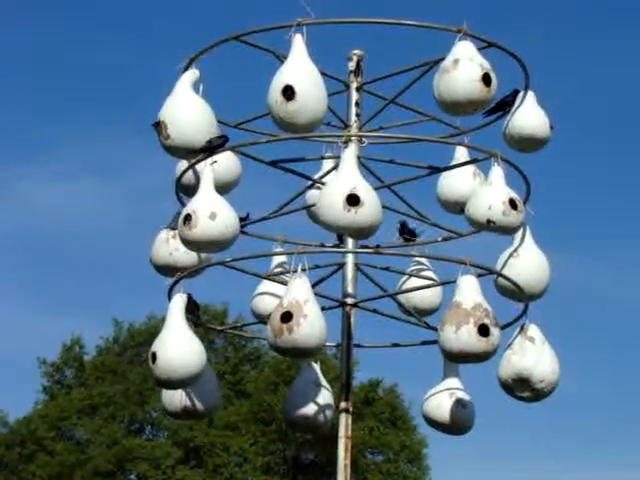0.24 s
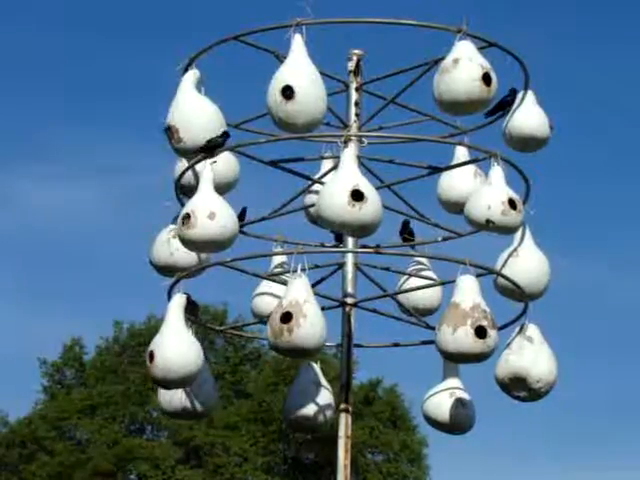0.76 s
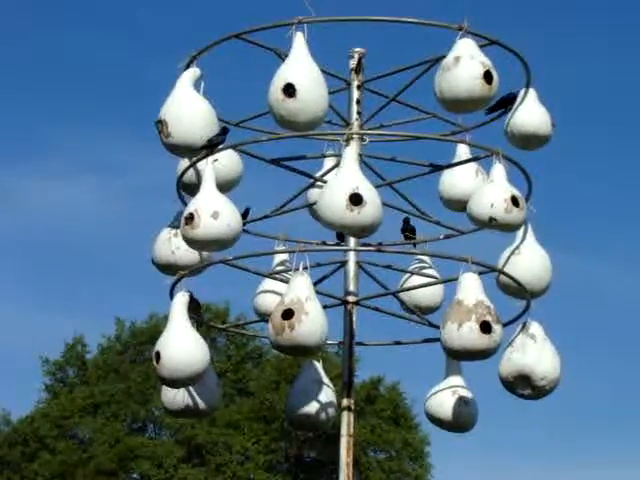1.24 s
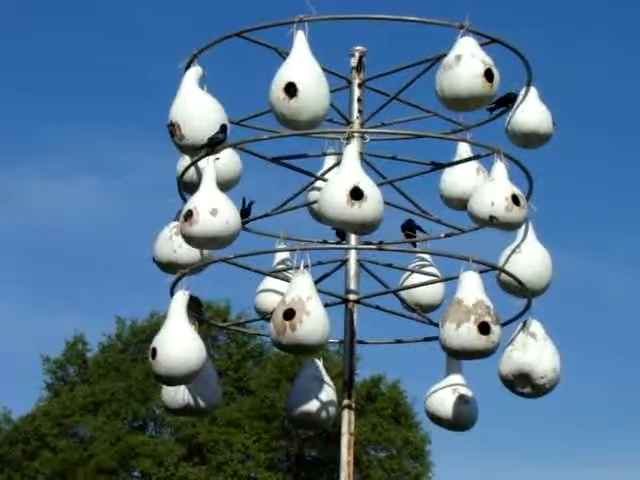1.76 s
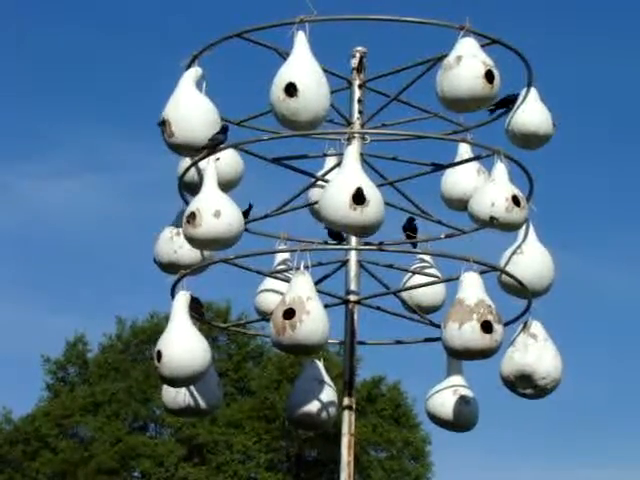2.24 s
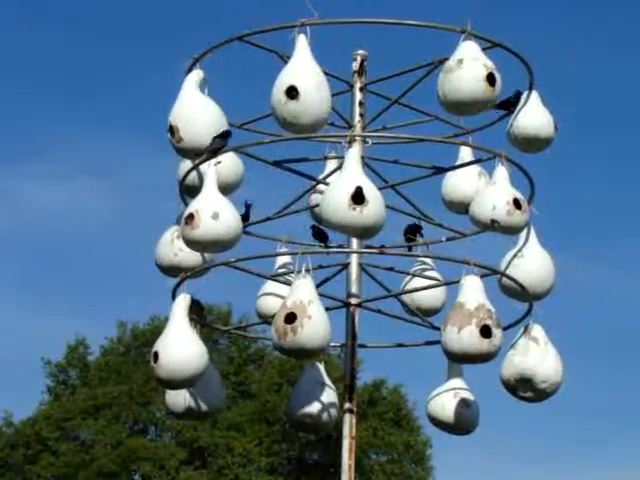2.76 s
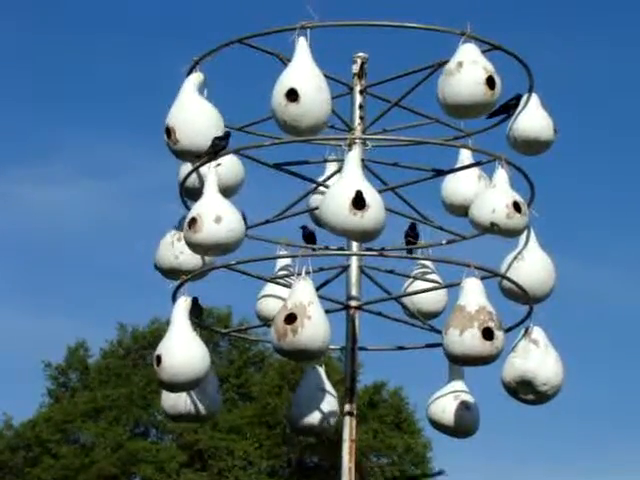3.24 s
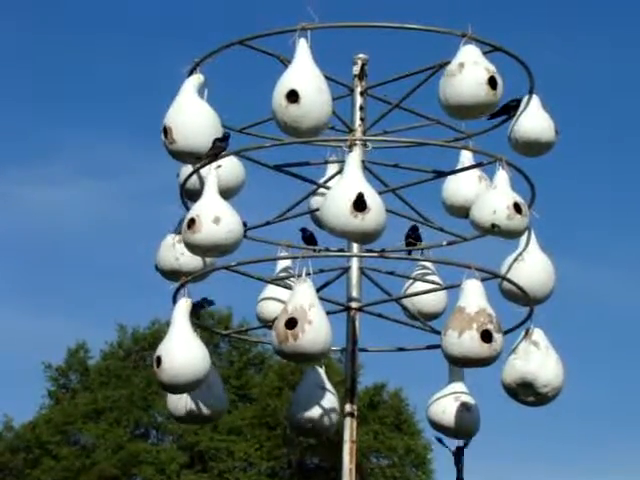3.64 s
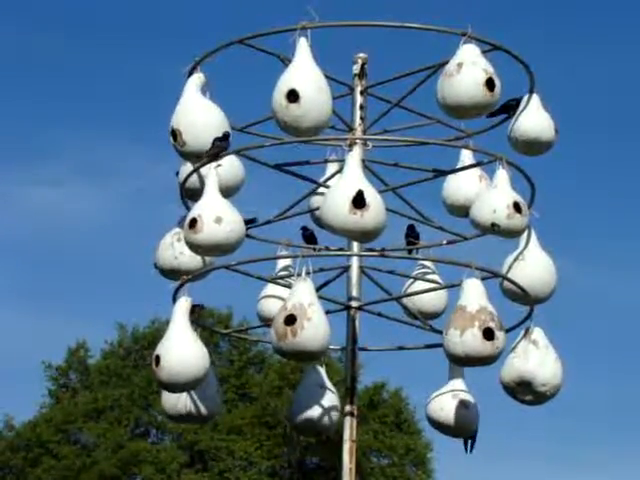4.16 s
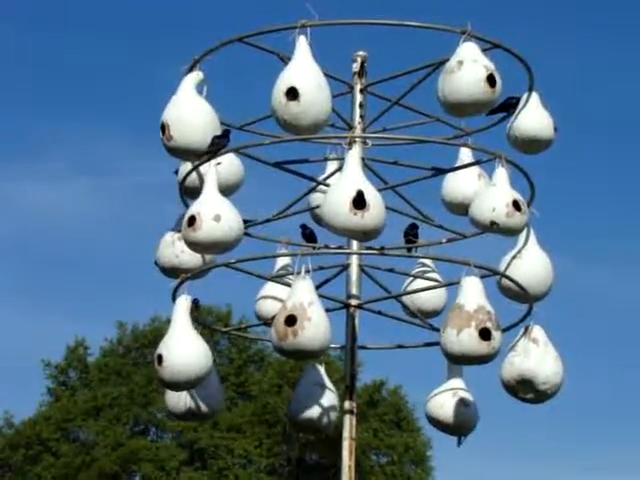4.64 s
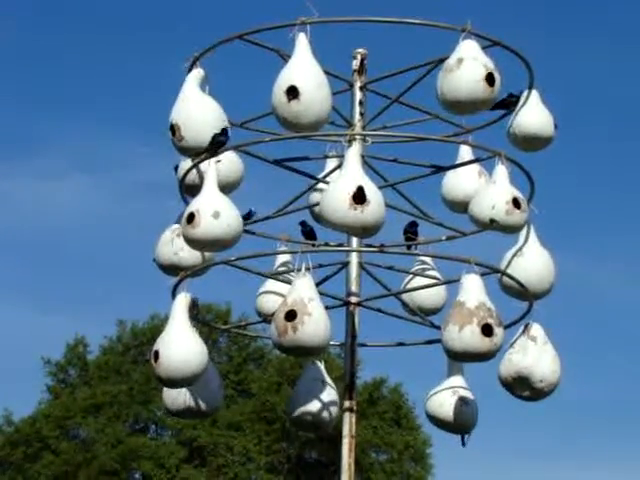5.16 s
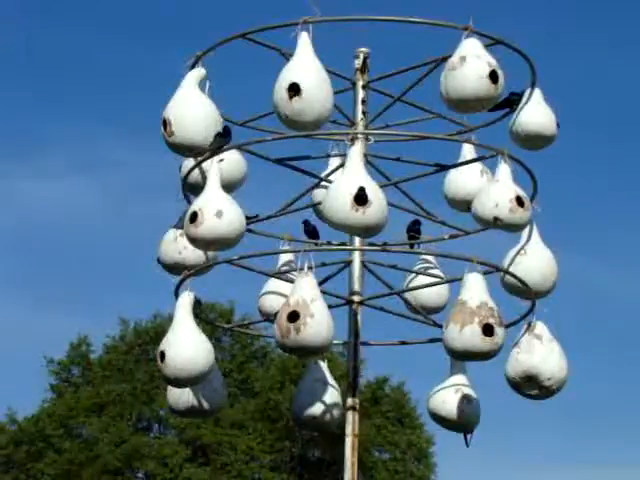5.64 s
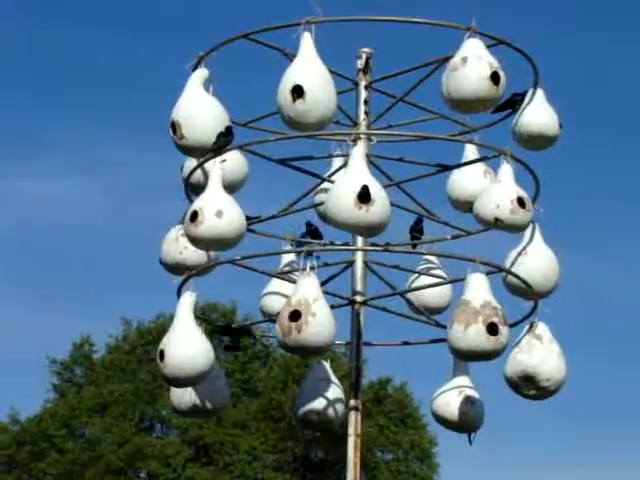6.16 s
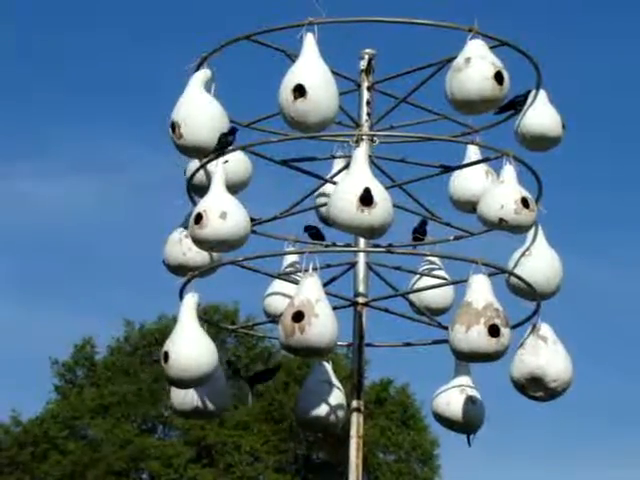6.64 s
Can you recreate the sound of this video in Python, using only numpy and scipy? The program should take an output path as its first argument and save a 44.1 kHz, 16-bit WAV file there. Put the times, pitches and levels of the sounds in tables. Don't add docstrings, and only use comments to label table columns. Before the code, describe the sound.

An outdoor colony of martins heard from some metres away on a small camera microphone. From 0 to 0.9 s chirps crowd together: fast falling chips, a full cheer near 0.2 s, gurgles and bright calls around 0.7 s. From 0.95 to 1.4 s only thin, soft whistles remain. A sharp cluster breaks in at 1.5 s, with more chips and a clear whistle near 2 s and a loud group around 2.4 s. A few dry bill clicks come at 2.7-3 s. From 3.3 to 4.3 s rattles mix with arched, dropping calls; a quieter gap follows, then strong calls near 4.9-5.2 s and a clear high whistle at 5.6 s. From 5.8 s to the end at about 6.9 s, overlapping chatter, rattles, low gulps and hoarse notes thicken. Soft leaves, far birds, distant traffic and hiss continue beneath, with low wind puffs, stronger near 0.4 and 3 s.

```python
import sys
import numpy as np
from scipy import signal
from scipy.fft import rfft, irfft
from scipy.io import wavfile
from scipy.ndimage import uniform_filter1d

SR = 44100
rng = np.random.default_rng(int(sys.argv[2]) if len(sys.argv) > 2 else 0)


def ratio(d):
    e = np.asarray(d, float) / 20
    return 10 ** e


def int16_out(signal):
    q = np.round(np.clip(np.atleast_2d(signal).T, -1, 1) * 32767)
    wavfile.write(sys.argv[1], SR, q.astype(np.int16))


N = 304290

SLACK_HZ, STROKE_SLACK_HZ = 1200, 1340
SAG_OCT_S = -2.2


def coloured(points):
    hz, db = np.transpose(points)
    f = np.maximum(np.arange(N // 2 + 1) * SR / N, 1)
    gain = ratio(np.interp(np.log(f), np.log(hz), db))
    x = irfft(rfft(rng.standard_normal(N)) * gain, N)
    return x / np.std(x)


def walk(rate):
    k = int(SR / rate)
    steps = np.repeat(rng.standard_normal(N // k + 1), k)
    x = uniform_filter1d(uniform_filter1d(steps, k), k)[:N]
    return x / np.std(x)


def swell(u, rise, fall):
    opening = np.sin(np.pi / 2 * np.clip(u / rise, 0, 1)) ** 2
    closing = np.sin(np.pi / 2 * np.clip((1 - u) / fall, 0, 1)) ** 2
    return opening * closing


def garden(sway_db=-0.78, lift_db=1.):
    # f/Hz, level/dB per Hz
    floor = [(15, -46), (25, -10), (97, 10.5), (192, -3), (595, 0.5), (983, -2), (2140, -2.5), (3130, -5),
             (4230, -9), (9460, -19.5), (10200, -33.5), (13300, -59), (22000, -120)]
    return ratio(-47.5 + lift_db + sway_db * walk(2.846)) * coloured(floor)


def wind(lull_db=-63.0, gusty_db=2.5, flap_db=0.5, gain_db=-7.0, length=0.056):
    # t/s, peak level/dB
    puffs = [(0.067, -27), (0.129, -36), (0.207, -28), (0.284, -29), (0.431, -15), (0.817, -31),
             (0.895, -33), (1.349, -40), (1.842, -32.5), (2.21, -24), (2.268, -21), (2.417, -34.5),
             (2.477, -37), (2.546, -30), (2.709, -24.5), (2.971, -18), (3.242, -19), (3.566, -33),
             (3.66, -32), (3.772, -27), (3.859, -36), (3.983, -26.5), (5.155, -29.5), (6.1, -38),
             (6.328, -29)]
    # f/Hz, level/dB per Hz
    rumble = [(18, -47), (30, -13.5), (161, 4.5), (285, -2.5), (362, -10), (524, -16.5), (697, -28.5),
              (900, -28), (1170, -61), (1980, -120)]
    push = ratio(lull_db + gusty_db * walk(11))
    for s, db in puffs:
        i = max(int((s - .006) * SR), 0)
        u = np.linspace(0, 1, min(int(length * SR), N - i))
        push[i:i + len(u)] += ratio(db + gain_db) * swell(u, 0.28, 0.82)
    return push * ratio(flap_db * walk(70)) * coloured(rumble)


def drift(rows, octaves_per_s):
    return [(s, length, hz, hz * 2 ** (octaves_per_s * length), db) for s, length, hz, db in rows]


def relax(rows, tau_s, slack_hz):
    return [(s, length, hz, slack_hz + (hz - slack_hz) * np.exp(-length / tau_s), db)
            for s, length, hz, db in rows]


def sing(notes, over_db, rise, fall, rasp_db, bend, beat=0., hiss_db=-40., burr_db=3., waver=.011,
         rolloff_db=-9., slack_hz=0.):
    throat_low_hz, throat_high_hz = 1120, 5800
    beak_hz, beak_width_hz, beak_lift = 3000, 750, .7
    beat_hz = 710
    # f/Hz, level/dB
    breath = [(3000, -37.5), (6500, 3), (8500, 7.5), (11000, -4.5)]
    out = np.zeros(N)
    burr, wobble, air = walk(260), walk(200), walk(1800)
    hiss = coloured(breath)
    for s, length, start_hz, end_hz, db in notes:
        i = int(s * SR)
        u = np.linspace(0, 1, min(int(length * SR), N - i))
        here = slice(i, i + len(u))
        span = (start_hz - slack_hz) * ((end_hz - slack_hz) / (start_hz - slack_hz)) ** (u ** bend)
        hz = (slack_hz + span) * (1 + waver * wobble[here])
        phase = 2 * np.pi * np.cumsum(hz) / SR
        throat = 1 / (1 + (throat_low_hz / hz) ** 4) / (1 + (hz / throat_high_hz) ** 2)
        throat = throat * (1 + beak_lift / (1 + ((hz - beak_hz) / beak_width_hz) ** 2))
        rasp = ratio(rasp_db) * air[here]
        voice = throat / throat.max() * np.sin(phase) * (1 + rasp)
        for k in (2, 3, 4):
            muffle = (1 + (k * hz / throat_high_hz) ** 4) ** .5
            breathy = (1 + k * rasp) / muffle * (k * hz < .4 * SR)
            voice = voice + ratio(over_db + rolloff_db * (k - 2)) * breathy * np.sin(k * phase)
        voice = voice * (1 + beat * np.cos(2 * np.pi * beat_hz * u * length))
        voice = voice + ratio(hiss_db) * hiss[here]
        out[here] += ratio(db + burr_db * burr[here]) * swell(u, rise, fall) * voice
    return out


def colony(count=800, top_hz=3300., spread=.45, octaves_per_s=24.0, gain_db=0.0):
    # t/s, level/dB
    chatter = [(0, -31), (.34, -41), (.5, -34), (.88, -36), (.95, -67.5), (1.48, -61), (1.53, -37),
               (1.68, -51), (2.05, -38), (2.25, -50.5), (3.25, -45), (3.4, -37), (3.6, -51), (4.5, -55.5),
               (5.7, -49), (5.85, -41.5), (6.14, -42), (6.2, -33), (6.4, -39), (6.62, -34), (6.9, -35.5)]
    chance = rng.random((count, 4)).T
    s = chance[0] * (N / SR - .01)
    length = .015 + .035 * chance[1]
    start_hz = top_hz * 2 ** (spread * (2 * chance[2] - 1))
    db = np.interp(s, *np.transpose(chatter)) + gain_db - 8 * chance[3]
    notes = zip(s, length, start_hz, start_hz * 2 ** (-octaves_per_s * length), db)
    return sing(notes, over_db=-19., rise=.25, fall=.4, rasp_db=-14., bend=.8, hiss_db=-30.)


def chips():
    # t/s, length/s, start f/Hz, level/dB
    chews = [(0, 0.026, 3450, -26), (.016, 0.022, 4010, -21), (.089, 0.012, 3905, -32.5),
             (.36, 0.075, 3686, -29.5), (.415, 0.044, 2700, -30), (.491, 0.048, 3120, -33),
             (1.385, 0.02, 2530, -35.5), (1.549, 0.04, 5850, -31.5), (1.573, 0.031, 2560, -41),
             (2.82, .032, 2450, -39), (.305, .025, 2400, -34), (2.045, 0.057, 3890, -23),
             (2.07, 0.045, 2466, -34), (2.359, 0.048, 4560, -26), (2.377, 0.05, 3630, -24),
             (2.765, 0.049, 3300, -39), (2.889, 0.047, 3920, -22.5), (4.691, 0.028, 2550, -36),
             (4.709, 0.054, 3300, -32), (5.065, 0.052, 3880, -37), (5.113, 0.025, 2980, -39),
             (5.779, 0.026, 2575, -33), (5.797, 0.031, 3500, -26.5), (3.757, .032, 6300, -35),
             (4.13, .025, 4100, -42), (6.308, 0.038, 6450, -34), (4.893, .03, 4500, -38),
             (6.813, 0.062, 5800, -27.5), (4.775, 0.031, 2630, -39), (6.829, .04, 3300, -23),
             (5.853, .02, 2400, -36)]
    # t/s, length/s, start f/Hz, level/dB
    drawls = [(.024, 0.077, 6500, -29), (.397, 0.089, 3890, -42.5), (.515, 0.068, 3266, -29),
              (.84, 0.079, 6040, -43), (1.518, 0.018, 5160, -32), (1.581, 0.025, 3960, -33.5),
              (1.938, 0.082, 3754, -25), (2.112, 0.039, 2809, -29), (2.353, 0.045, 3200, -33.5),
              (2.925, 0.016, 4040, -35), (2.974, .019, 3450, -33.5), (3.197, 0.075, 5030, -44),
              (3.211, 0.035, 8000, -41), (3.47, .012, 5100, -33), (4.048, 0.091, 4300, -36.5),
              (.563, .034, 3300, -25), (2.68, .025, 3120, -40), (.148, .06, 3700, -37),
              (4.249, 0.047, 3640, -34.5), (4.563, .036, 4850, -37.5), (5.429, 0.013, 2140, -37),
              (6.437, 0.059, 4590, -31), (6.627, 0.085, 4360, -27.5), (6.355, .036, 3900, -32),
              (6.208, .052, 4900, -31), (3.795, .032, 4850, -33), (5.325, .06, 2900, -33),
              (5.905, .06, 2750, -37), (2.085, .04, 4000, -40), (1.515, .045, 6600, -33),
              (1.54, .03, 5600, -34), (1.85, .03, 5400, -33), (6.235, .045, 4200, -34),
              (3.365, .04, 4500, -35), (3.415, .04, 3700, -35), (6.55, 0.064, 4680, -36),
              (3.338, 0.047, 5470, -28.5)]
    notes = relax(drawls, .055, SLACK_HZ) + relax(chews, .03, SLACK_HZ)
    return ratio(3.0) * sing(notes, over_db=-29.0, rise=0.083, fall=0.41, rasp_db=-12.0, bend=1,
                           slack_hz=SLACK_HZ)


def rasps():
    # t/s, length/s, start f/Hz, level/dB
    bursts = [
        (6.168, .125, 4200, -65),
        (.015, .09, 4000, -66),
        (6.8, .08, 4200, -69),
        (6.66, .07, 4000, -71),
        (2.88, .03, 4500, -68),
    ]
    return sing(drift(bursts, SAG_OCT_S), over_db=-30., rise=.15, fall=.5, rasp_db=0., bend=1, hiss_db=20.)


def hooks():
    rest_hz, tau_s = 1960, .02
    # t/s, length/s, start f/Hz, level/dB
    calls = [
        (.023, .036, 2600, -27),
        (2.416, .042, 2500, -27),
        (2.94, .055, 2600, -27),
        (4.108, .03, 2800, -36),
        (6.193, .098, 3400, -27),
        (5.365, .08, 2800, -28),
        (1.789, .05, 4100, -30),
    ]
    return ratio(1.) * sing(relax(calls, tau_s, rest_hz), over_db=-25., rise=.2, fall=.4, rasp_db=-12., bend=1,
                          hiss_db=-30., slack_hz=rest_hz)


def rattles(uneven_s=.0007, uneven_db=1., uneven_hz=100., snap_s=.016):
    # t/s, length/s, period/s, top f/Hz, level/dB
    runs = [(3.392, .065, .026, 2900, -35), (3.562, .11, .031, 2700, -32), (3.942, .11, .0235, 3900, -31),
            (4.233, .11, .031, 2800, -30), (5.252, .135, .03, 2950, -33), (5.815, .07, .028, 2600, -36),
            (6.038, .1, .028, 3000, -33), (6.452, .12, .027, 3400, -31), (6.607, .16, .025, 3400, -30),
            (.5, .13, .035, 2400, -36), (6.24, .15, .028, 3800, -33), (.03, .11, .03, 2600, -36)]
    notes = []
    for s, length, period, hz, db in runs:
        at = np.arange(s, s + length, period)
        late, loud, sharp = rng.standard_normal((12, 3))[:len(at)].T
        rows = zip(at + uneven_s * late, period + 0 * at, hz + uneven_hz * sharp, db + uneven_db * loud)
        notes += relax(rows, period - snap_s, STROKE_SLACK_HZ)
    return notes


def strokes():
    # t/s, length/s, start f/Hz, level/dB
    singles = [
        (4.028, .035, 3300, -34),
        (6.771, 0.028, 1880, -38),
    ]
    notes = relax(singles, .014, STROKE_SLACK_HZ) + rattles()
    return ratio(3.0) * sing(notes, over_db=-20.5, rise=0.14, fall=0.27, rasp_db=-5.5, bend=1, burr_db=2.5,
                           slack_hz=STROKE_SLACK_HZ)


def slurs():
    # t/s, length/s, start f/Hz, level/dB
    quick = [(.095, .07, 3700, -33), (.71, .04, 4300, -31), (1.54, .085, 4800, -31), (3.81, .04, 2600, -34),
             (3.445, .04, 2400, -35), (.575, .02, 2400, -32), (3.82, .025, 3300, -35),
             (4.62, .035, 2250, -39), (6.858, .03, 4400, -33), (.599, .021, 3080, -30),
             (.837, 0.026, 3020, -30), (.875, 0.016, 2830, -32.5), (1.47, 0.017, 3415, -21),
             (1.845, 0.054, 4490, -31.5), (2.444, .032, 3569, -34.5), (2.665, 0.015, 1980, -34),
             (4.6, 0.038, 3820, -28.5), (4.92, 0.055, 2386, -33.5), (6.756, .024, 2910, -28.5),
             (.454, 0.032, 2284, -29.5), (1.5, 0.019, 3040, -22.5), (6.346, 0.019, 2020, -29),
             (.73, 0.013, 3100, -18.5), (6.592, 0.02, 2420, -24.5), (5.338, .032, 3310, -29.5)]
    # t/s, length/s, start f/Hz, level/dB
    glides = [
        (.57, 0.068, 4940, -34),
        (.573, .014, 5950, -38),
        (1.836, .04, 5550, -27.5),
        (2.354, .07, 5070, -23.5),
        (4.915, 0.029, 5800, -33),
        (5.161, 0.051, 5890, -34),
        (5.831, 0.042, 3510, -32),
        (6.656, 0.061, 5750, -41.5),
        (6.868, .03, 3250, -28),
        (.721, 0.014, 4060, -30.5),
    ]
    notes = relax(glides, .13, SLACK_HZ) + relax(quick, .072, SLACK_HZ)
    return ratio(0.5) * sing(notes, over_db=-21.5, rise=0.21, fall=0.49, rasp_db=-6.0, bend=0.97, beat=0.14,
                           slack_hz=SLACK_HZ)


def cheers():
    rest_hz, tau_s = 1720, .028
    # t/s, length/s, start f/Hz, level/dB
    calls = [
        (.221, .1, 3800, -19),
        (1.527, .08, 3540, -21),
        (3.312, .108, 3950, -23),
        (6.3, .08, 3850, -23),
    ]
    return ratio(2.) * sing(relax(calls, tau_s, rest_hz), over_db=-14., rise=.12, fall=.8, rasp_db=-9.,
                          bend=1.15, beat=.15, burr_db=4., hiss_db=-28., slack_hz=rest_hz)


def whistles():
    # t/s, length/s, start f/Hz, level/dB
    rising = [(.94, .05, 3850, -47), (1.25, 0.038, 1160, -45.5), (1.511, .034, 1988, -29.5),
              (2.05, .088, 4180, -46), (1.77, .06, 1200, -47), (2.14, .045, 3480, -47),
              (4.31, .04, 4700, -52), (6.672, .025, 2520, -27), (2.525, .02, 1350, -47),
              (2.19, 0.052, 1493, -46), (2.49, 0.029, 1157, -42.5), (3.113, .05, 1900, -32),
              (4.36, .055, 3950, -51), (5.392, .035, 5710, -39.5), (6.755, 0.018, 2195, -26)]
    # t/s, length/s, start f/Hz, level/dB
    held = [(1.279, 0.11, 3136, -41), (1.329, 0.044, 2107, -42.5), (1.428, 0.023, 3200, -45),
            (1.813, 0.035, 3970, -38.5), (1.962, 0.027, 3060, -19), (2.16, .15, 2800, -45.5),
            (2.319, 0.075, 1519, -41.5), (2.922, 0.086, 5240, -53), (3.214, 0.027, 2070, -41),
            (3.552, .15, 4570, -52), (5.004, 0.11, 3970, -44), (5.096, 0.15, 3900, -44),
            (5.44, 0.075, 6250, -48), (5.436, 0.067, 3820, -50), (5.728, .034, 6260, -54),
            (6.59, 0.061, 4300, -55.5), (4.24, .065, 4500, -51), (6.025, .03, 5010, -44),
            (2.39, .07, 1620, -42), (1.04, .06, 5450, -50), (1.06, .05, 3820, -51), (6.255, .03, 4950, -40),
            (2.285, .035, 1550, -48), (1.625, .03, 2050, -42), (4.39, .1, 4020, -51),
            (4.5, .055, 4520, -51), (3.47, .03, 3580, -41), (5.93, .09, 4200, -53),
            (3.088, .015, 2050, -40), (6.875, .024, 2350, -33), (.93, .015, 3400, -39),
            (6.198, .014, 3330, -24), (6.115, .012, 2750, -33)]
    # t/s, length/s, start f/Hz, level/dB
    sagging = [(.778, .03, 2704, -33), (1.056, 0.12, 2880, -30.5), (1.168, 0.071, 2820, -43.5),
               (1.687, 0.14, 5170, -42.5), (1.98, .053, 4000, -41), (2.0, .035, 2730, -32.5),
               (.805, .04, 2620, -31), (.81, .025, 3020, -35), (5.222, .028, 4050, -40),
               (5.502, 0.047, 4910, -37), (5.698, 0.031, 4350, -38.5), (5.893, 0.117, 2856, -26),
               (6.149, .04, 4180, -42), (6.229, .06, 2246, -31), (6.87, .027, 1620, -30),
               (2.998, 0.026, 3690, -39), (2.035, 0.028, 2380, -22.5), (6.715, 0.032, 2554, -24.5)]
    # t/s, length/s, start f/Hz, level/dB
    falling = [(.277, .035, 3650, -36), (.98, .062, 3420, -29), (.989, 0.053, 4670, -44),
               (3.191, .02, 5400, -47.5), (3.385, .03, 3720, -33.5), (3.835, .018, 4100, -41),
               (4.742, 0.033, 3300, -35), (5.256, 0.068, 3900, -35), (2.345, .02, 6700, -40),
               (2.37, .03, 5450, -30), (5.756, 0.046, 5100, -32), (6.687, .02, 3740, -35.5),
               (1.824, .018, 6300, -36), (2.787, .014, 5400, -41), (2.704, .012, 3750, -38),
               (2.704, .012, 2400, -39)]
    # t/s, length/s, start f/Hz, level/dB
    lasting = [
        (5.574, .12, 5080, -35),
        (4.41, .09, 4780, -53),
    ]
    notes = drift(rising, 3.5) + drift(held, .4) + drift(sagging, SAG_OCT_S)
    notes += drift(falling, -5.) + drift(lasting, -.4)
    return ratio(3.5) * sing(notes, over_db=-30.5, rise=0.096, fall=0.2, rasp_db=-17.5, bend=1, burr_db=2.5,
                           waver=0.0038)


def gulps():
    # t/s, length/s, start f/Hz, level/dB
    low = [(.45, .015, 1620, -33), (1.668, .025, 1270, -44), (1.7, .02, 1220, -47),
           (1.922, .016, 1950, -38), (2.002, .022, 1850, -34), (2.15, .022, 1660, -38),
           (3.075, .014, 1850, -38), (3.032, .016, 2120, -40), (4.742, .035, 1680, -38),
           (5.1, .028, 1720, -39), (5.315, .014, 1560, -36), (5.343, .016, 1540, -34),
           (5.4, .025, 1680, -39), (5.865, .03, 1430, -39), (6.07, .016, 1350, -38), (6.1, .014, 1200, -37),
           (6.124, .022, 1380, -36), (6.465, .018, 1450, -36), (6.488, .014, 1450, -34),
           (6.51, .016, 1500, -34), (6.538, .02, 1450, -33), (6.63, .02, 1480, -36),
           (6.668, .022, 1420, -35), (6.7, .012, 1400, -36), (6.835, .012, 1550, -35),
           (.32, .014, 1200, -39), (1.835, .025, 2100, -38), (1.865, .04, 1950, -40), (.4, .022, 1600, -34),
           (5.79, .014, 1250, -42)]
    return ratio(1.) * sing(drift(low, SAG_OCT_S), over_db=-25., rise=.25, fall=.4, rasp_db=-10., bend=1)


def bright_calls():
    # t/s, length/s, start f/Hz, level/dB
    calls = [
        (.659, 0.041, 3350, -24),
        (.671, 0.092, 4300, -25),
        (.688, 0.038, 3350, -29.5),
        (3.781, .05, 3520, -21.5),
        (4.544, 0.045, 3380, -31),
        (4.573, 0.063, 3300, -31.5),
        (4.878, 0.051, 2740, -30),
        (5.126, 0.074, 3633, -28),
        (6.177, .035, 5300, -26),
        (6.556, 0.039, 2660, -31),
    ]
    return ratio(2.0) * sing(relax(calls, .034, SLACK_HZ), over_db=-15.5, rise=0.18, fall=.68, rasp_db=-8.5,
                           bend=1, beat=0.1, hiss_db=-25.5, slack_hz=SLACK_HZ)


def clicks(decay_s=.005, band_hz=(2800., 7000.)):
    # t/s, level/dB
    snaps = [
        (2.703, -31),
        (2.789, -31),
        (2.988, -34),
    ]
    push = np.zeros(N)
    for s, db in snaps:
        i = int(s * SR)
        push[i:] += ratio(db) * np.exp(-np.arange(N - i) / SR / decay_s)
    band = signal.butter(2, band_hz, "band", fs=SR, output="sos")
    return signal.sosfilt(band, push * rng.standard_normal(N))


def arched_calls():
    # t/s, length/s, start f/Hz, end f/Hz, level/dB
    calls = [
        (3.491, .053, 4790, 3350, -22),
        (4.9, 0.057, 4840, 3110, -19.5),
        (5.148, .062, 4760, 3140, -20.5),
        (5.578, 0.035, 3250, 2010, -29.5),
        (5.627, 0.027, 2810, 1440, -23.5),
        (5.665, .03, 2550, 1600, -24),
        (3.752, .035, 3100, 2000, -29),
        (6.16, .045, 3000, 2000, -27),
        (6.795, .036, 3150, 2000, -23),
        (4.797, .036, 4200, 3500, -46),
    ]
    return ratio(2.0) * sing(calls, over_db=-25.0, rise=0.15, fall=0.3, rasp_db=-14.0, bend=2.4, beat=0.15,
                           hiss_db=-36.0)


def martins():
    return (chips() + rasps() + hooks() + strokes() + slurs() + cheers() + whistles() + gulps()
            + bright_calls() + arched_calls())


def scatter(x, ground_s=.009, ground_db=-15., wall_s=.026, wall_db=-19., dull_hz=4000.):
    leaves_t60_s, leaves_db = .35, -15
    twigs_t60_s, twigs_db = .11, -10
    t = np.arange(SR // 2) / SR
    tail = rng.standard_normal(len(t)) * np.exp(-np.log(1000) * t / leaves_t60_s) * np.minimum(t / 0.01, 1)
    tail = signal.sosfilt(signal.butter(1, dull_hz, fs=SR, output="sos"), tail)
    tail = ratio(leaves_db) * tail / np.sqrt(np.sum(tail ** 2))
    near = rng.standard_normal(len(t)) * np.exp(-np.log(1000) * t / twigs_t60_s)
    tail = tail + ratio(twigs_db) * near / np.sqrt(np.sum(near ** 2))
    tail[0] = 1
    tail[int(ground_s * SR)] += ratio(ground_db)
    tail[int(wall_s * SR)] += ratio(wall_db)
    return signal.fftconvolve(x, tail)[:N]


def scene():
    birds = scatter(martins() + colony() + clicks())
    return (garden() + wind() + birds)[None, :]


def low_pass(x):
    return signal.sosfilt(signal.butter(12, 10480, fs=SR, output="sos"), x)


def record(dry):
    rounded = np.tanh(1.6 * dry) / 1.6
    top_cut = signal.ellip(10, .2, 80, 10190, fs=SR, output="sos")
    mix = signal.sosfilt(top_cut, rounded)
    return low_pass(mix)


dry = scene()
out = record(dry)
int16_out(out)
```